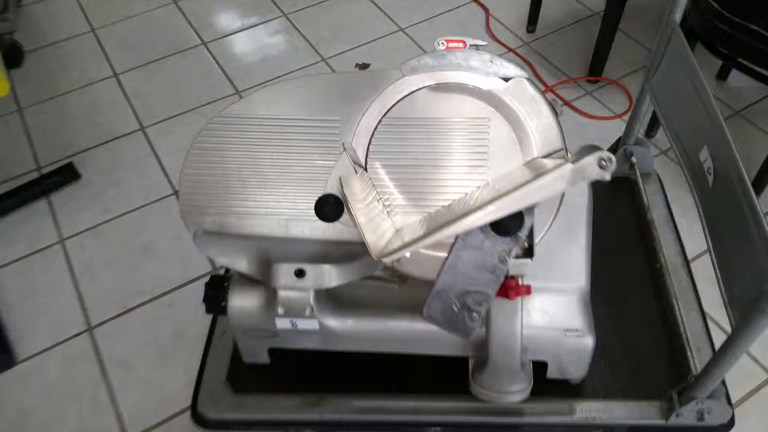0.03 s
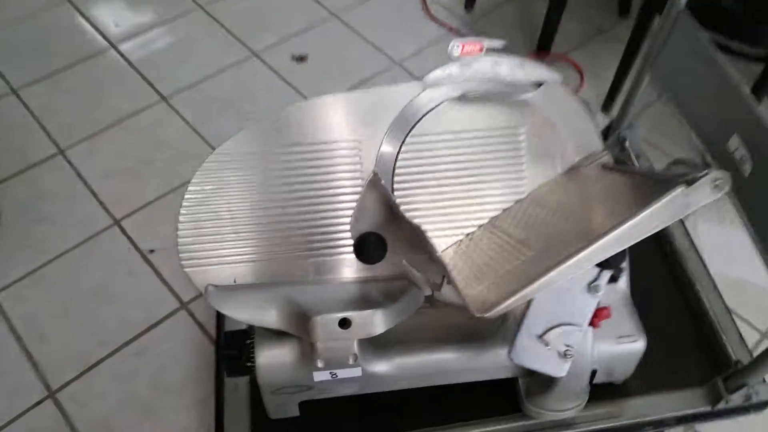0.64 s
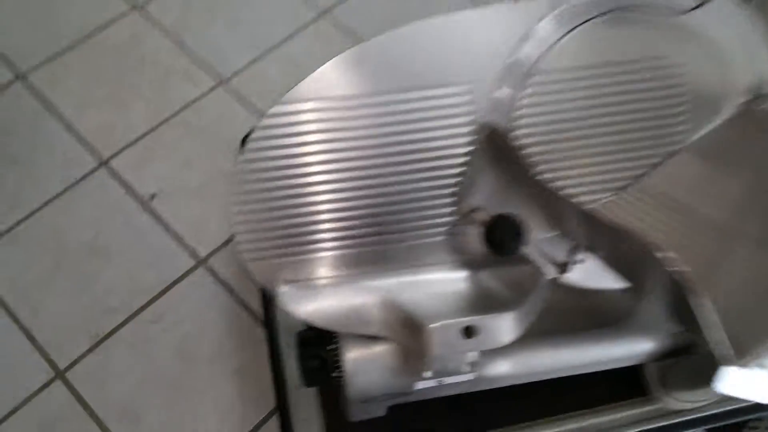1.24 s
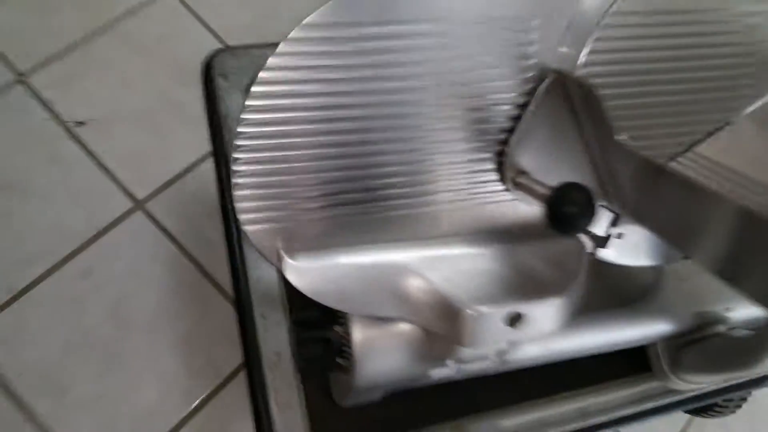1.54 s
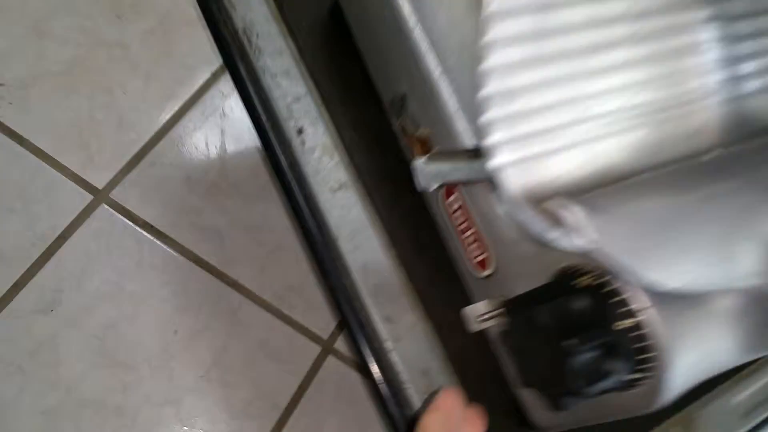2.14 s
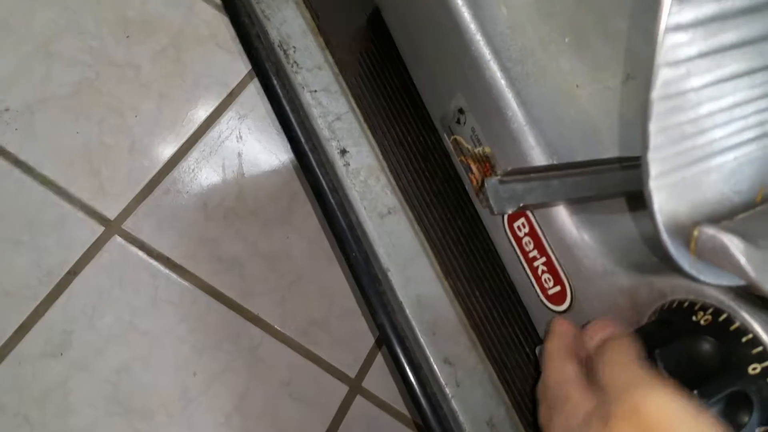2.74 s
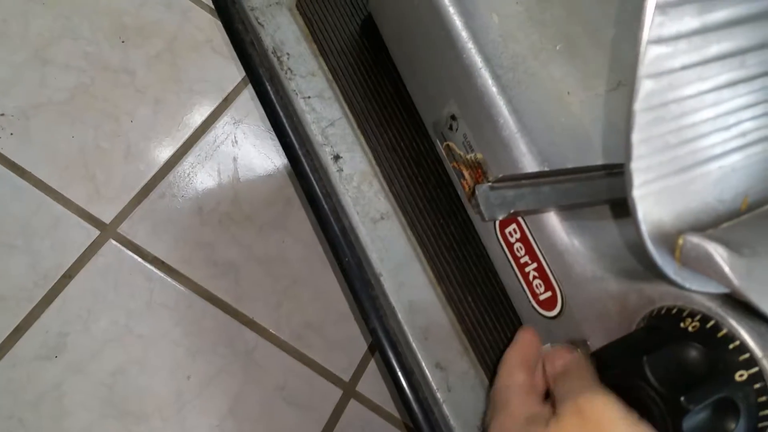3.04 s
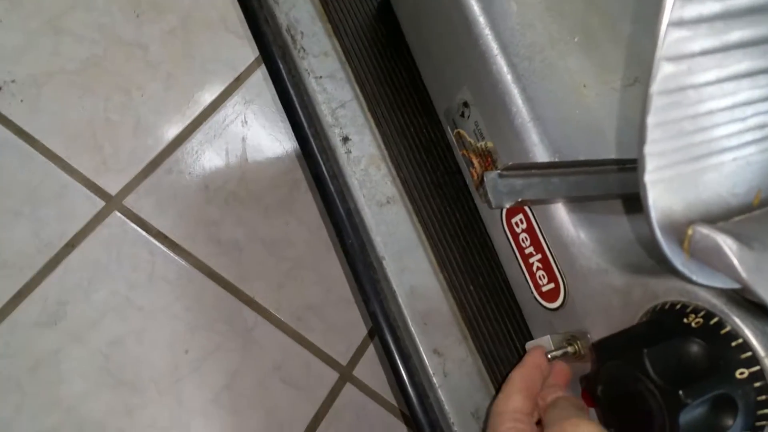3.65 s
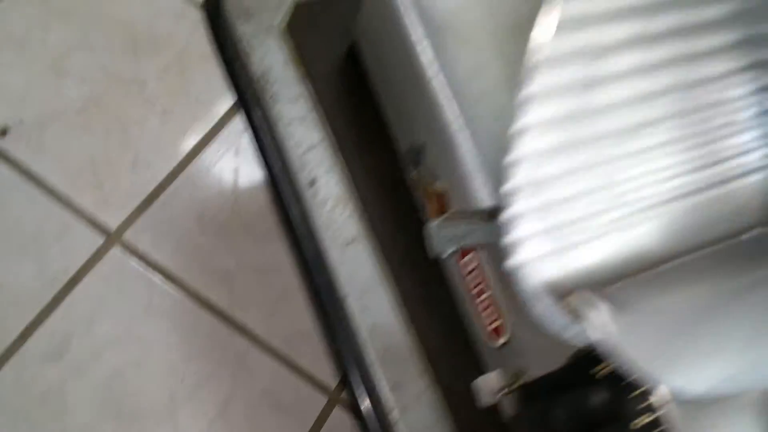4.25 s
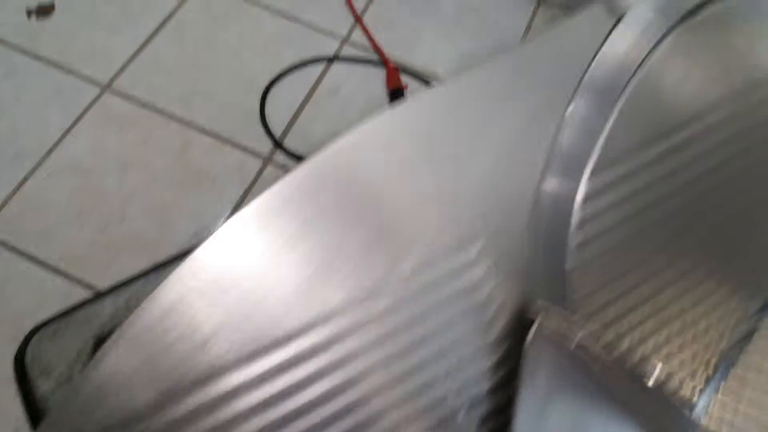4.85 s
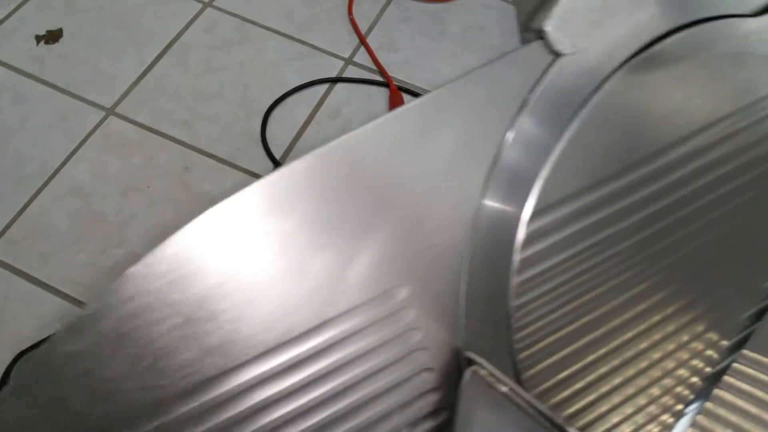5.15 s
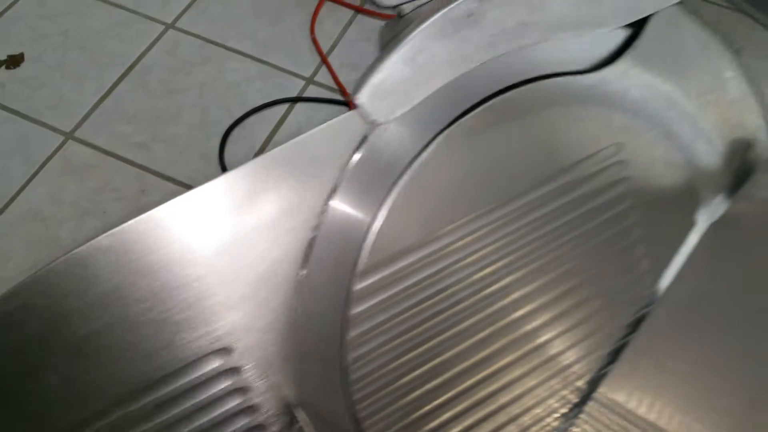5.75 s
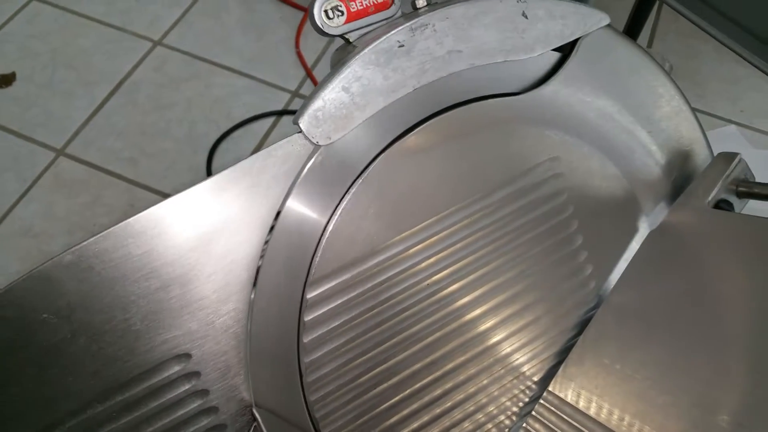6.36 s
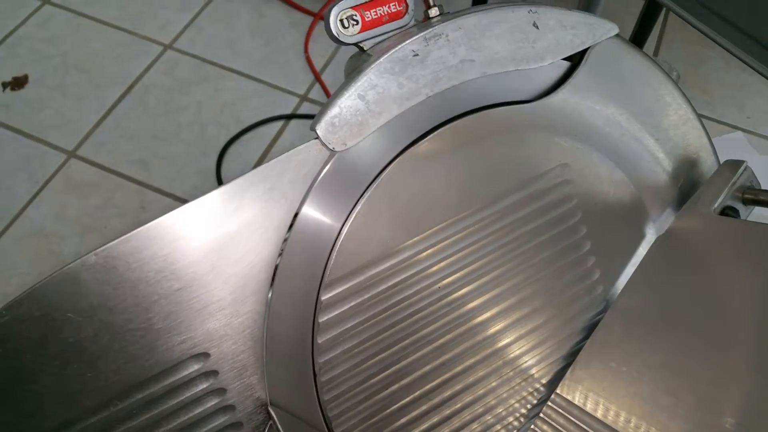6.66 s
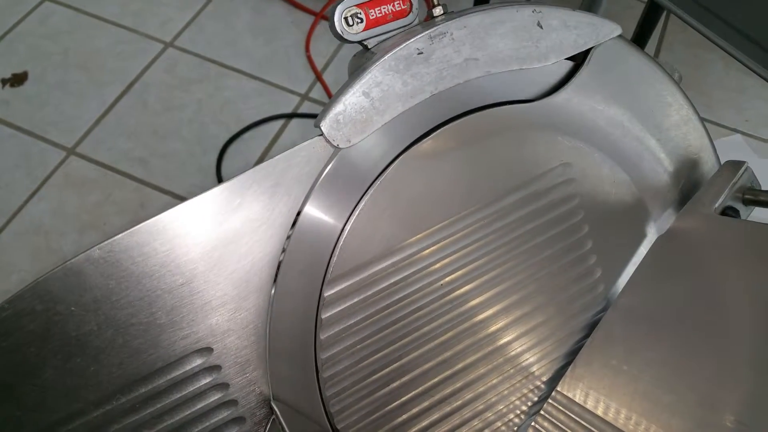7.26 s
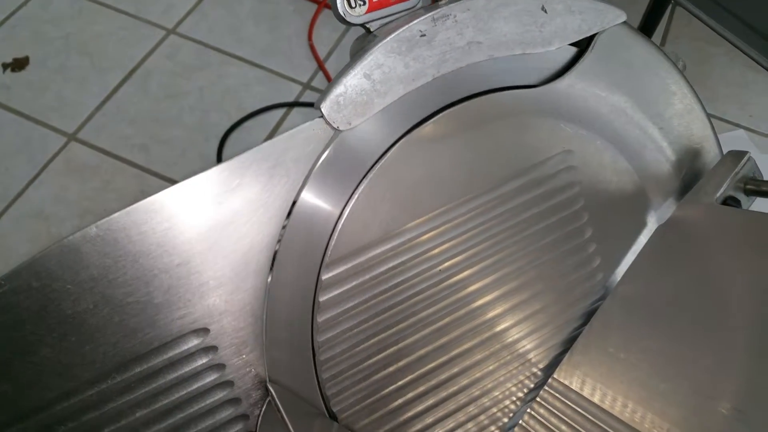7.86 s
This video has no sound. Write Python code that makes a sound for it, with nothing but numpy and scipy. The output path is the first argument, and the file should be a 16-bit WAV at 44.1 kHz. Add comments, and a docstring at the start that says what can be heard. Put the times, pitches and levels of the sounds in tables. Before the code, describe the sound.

A faint low room rumble fades in at about 0.4 seconds, with an engine throbbing softly beyond the walls. A small dry tick comes at 0.5 seconds. Light knocks and very faint thin squeaks of handling follow between 1 and 2 seconds, then a few soft taps and tiny metal pings from 3 to 3.7 seconds. At about 3.9 seconds the switch of an electric deli slicer snaps on with a sharp, close click that rings briefly in the metal housing and tiled room. The motor spins up, and a second click follows at 4.1 seconds. It settles into a steady electric hum with a whirring drive and a soft blade hiss, which grow slightly as the microphone nears. From 4.5 seconds the blade brushes its guard faintly about five times a second, clearest near 5.7, with a few small rattles around 5.3. The slicer runs on until the end at 8 seconds.

```python
"""Deli slicer in a tiled room

An engine throbs faintly beyond the walls. After some light handling the toggle snaps on and the
induction motor runs up until its starting switch drops out with a click. It settles into a mains hum,
with the whir of the drive and the hiss of the blade, whose rim brushes its guard once a turn."""
import sys
import numpy as np
from scipy import signal
from scipy.fft import irfft, next_fast_len
from scipy.io import wavfile
from scipy.ndimage import uniform_filter1d

SR = 44100
rng = np.random.default_rng(int(sys.argv[2]) if len(sys.argv) > 2 else 0)


def to_wav(s):
    """Save 16-bit WAV."""
    ch = np.atleast_2d(s).T  # columns
    pcm = np.round(np.clip(ch, -1, 1) * 32767)  # PCM
    wavfile.write(sys.argv[1], SR, pcm.astype(np.int16))


N = 349272
TIME = np.arange(N) / SR
BASS_FADE_S, AIR_FADE_S = 0.51, 0.69
ON_S, DROP_OUT_S = 3.934, 4.112  # the toggle closes; the starting switch drops out
APPROACH_S = 4.56  # the listener starts to move over the casting and on to the blade
MAINS_HZ, ROTOR_HZ = 60, 29.98


def from_db(db):
    """Decibels to gain."""
    return 10 ** (np.asarray(db) / 20)


def unit_rms(x):
    """Scale to an rms of 1."""
    return x / np.sqrt(np.mean(x ** 2) + 1e-20)


def automation(rows):
    """One curve per column after the time, joined by straight lines."""
    times, *columns = np.transpose(rows)
    return [np.interp(TIME, times, column) for column in columns]


def at_hz(rows, hz):
    """Read a table on a log-frequency axis."""
    freqs, values = np.transpose(rows)
    return np.interp(np.log(hz + 1e-9), np.log(freqs), values)


def ramp(start, length):
    """A straight rise from 0 to 1."""
    return np.clip((TIME - start) / length, 0, 1)


def fade_in(length):
    """The background eases in after a short silence."""
    return ramp(0.41, length) ** 1.5


def swells(rows):
    """A smooth hump for each row of centre in seconds, length in seconds, level in dB."""
    return sum(from_db(db) * np.exp(-np.minimum((2 * (TIME - at) / length) ** 2, 50))
               for at, length, db in rows)


def drift(hz):
    """A smooth random wobble with a spread of 1."""
    step, warm_up = 40, 2000
    r = np.exp(-2 * np.pi * step * hz / SR)
    white = rng.standard_normal(N // step + warm_up + 2)
    slow = signal.lfilter([1], [1, -2 * r, r * r], white)[warm_up:]
    return np.interp(np.arange(N) / step, np.arange(len(slow)), unit_rms(slow))


def clicks(times, db):
    """One impulse per contact."""
    out = np.zeros(N)
    out[np.round(np.asarray(times) * SR).astype(int)] = from_db(db)
    return out + 1e-18


def decay(x, t60):
    """Each impulse dies away, by 60 dB in t60 seconds."""
    return signal.lfilter([1], [1, -from_db(-60 / (t60 * SR))], x)


def ring(x, hz, t60):
    """A unit impulse sets a sine of height 1 ringing."""
    r, w = from_db(-60 / (t60 * SR)), 2 * np.pi * hz / SR
    return signal.lfilter([0, np.sin(w)], [1, -2 * r * np.cos(w), r * r], x)


def resonate(x, hz, width):
    """A resonance with a peak gain of 1."""
    r, w = np.exp(-np.pi * width / SR), 2 * np.pi * hz / SR
    return signal.lfilter(np.array([1, 0, -1]) * (1 - r * r) / 2, [1, -2 * r * np.cos(w), r * r], x)


def pan(x, db):
    """Left louder than right by db."""
    return x * from_db([[db / 2], [-db / 2]])


# The stereo image. Each row: frequency in Hz, left-right correlation.
STEREO_LIKENESS = [(60, 0.67), (250, 0.86), (400, 0.94), (680, 0.45), (1300, -0.18), (3000, 0.019),
                   (15000, -0.047)]


def noise(spectrum, resonances=(), ripple_db=0):
    """Unit-rms stereo noise shaped by (Hz, dB) points, resonances and the ripple of many small modes."""
    size = next_fast_len(N)
    hz = np.arange(1, SR / 2, 3)
    octaves_outside = np.abs(np.log2(hz / np.clip(hz, spectrum[0][0], spectrum[-1][0])))
    colour_db = at_hz(spectrum, hz) - 36 * octaves_outside
    colour_db += ripple_db * unit_rms(uniform_filter1d(rng.standard_normal(len(hz)), size=25))
    for centre, width, lift in resonances:
        colour_db += lift / (1 + (2 * (hz - centre) / width) ** 2)
    alike = np.clip(at_hz(STEREO_LIKENESS, hz), -.99, .99)
    bins = np.arange(size // 2 + 1) * SR / size
    gains = [np.interp(bins, hz, from_db(colour_db) * np.sqrt(1 + sign * alike)) for sign in (1, -1)]
    mid, side = (gain * rng.standard_normal(2 * len(bins)).view(complex) for gain in gains)
    return unit_rms(irfft(np.array([mid + side, mid - side]), size)[:, :N])


# The tiled room's tail. Each row: frequency in Hz, t60 in seconds.
REVERB_T60 = [(200, 0.47), (1000, 0.46), (3000, 0.21), (7000, 0.21), (14000, 0.15)]


def room(x):
    """Diffuse echoes off the tiles; the treble dies first."""
    t, tail = TIME[:SR // 2], 0
    edges = np.geomspace(100, 18000, 9)
    for low, high in zip(edges, edges[1:]):
        hz = np.sqrt(low * high)
        band = signal.butter(2, [low, high], "band", fs=SR, output="sos")
        mid, side = signal.sosfilt(band, rng.standard_normal((2, len(t))))
        alike = at_hz(STEREO_LIKENESS, hz)
        stereo = np.sqrt(1 + alike) * mid + np.sqrt(1 - alike) * side * [[1], [-1]]
        tail = tail + stereo * from_db(-60 * t / at_hz(REVERB_T60, hz))
    tail = unit_rms(tail * (1 - np.exp(-t / 0.0015))) / np.sqrt(len(t))
    return signal.fftconvolve(x, tail, axes=1)[:, :N]


# The two colours of the room tone. Each row: frequency in Hz, relative level in dB.
RUMBLE_EQ = [(15, -32), (38, 1), (60, -5.5), (80, -3.5), (130, -2.5), (200, 4.5), (270, -8.5), (330, -23.5)]
AIR_EQ = [(210, -42), (350, 0), (373, -1), (466, -1), (824, -3.5), (1030, -6.5), (1530, -5.5),
          (2670, -13.5), (4870, -19.5), (6790, -15.5), (8480, -24), (11500, -22), (15500, -25)]
# The air's fader, ahead of the fade-in. Each row: time in seconds, level in dB.
AIR_FADER = [(1.1, -60), (2.7, -57.5), (3.3, -63)]


def room_tone(rumble_db=-49):
    """Low rumble and a faint wash of air."""
    air_db, = automation(AIR_FADER)
    rumble = from_db(rumble_db) * fade_in(BASS_FADE_S) * noise(RUMBLE_EQ)
    return rumble + from_db(air_db) * fade_in(AIR_FADE_S) * noise(AIR_EQ)


# The engine eases down to idle. Each row: time in seconds, cycles per second.
ENGINE_PACE = [(0.92, 14.8), (1.2, 13.4), (2.4, 13.1), (2.85, 12.3)]
# Its faders. Each row: time in seconds, throb level in dB, exhaust drone level in dB.
ENGINE_FADERS = [(0.85, -43.5, -42), (1.35, -46.5, -42.5), (1.95, -50.5, -46.5), (2.5, -48.5, -50),
                 (2.9, -43.5, -61), (3.2, -42.5, -60), (3.45, -43.5, -45.5), (3.9, -54.5, -44.5)]
# What passes the walls. Each row: centre in Hz, width in Hz, relative level in dB.
WALL_BANDS = [(39, 7.3, -23), (87, 18, -33), (111.6, 6.9, 4), (161.7, 8.1, 10.5), (184.4, 17, 6),
              (194, 26, -2.5), (230.8, 5.5, 12), (255.6, 5.7, -29)]


def distant_engine(strong_beat_s=3.135, idle_lope_db=10.5, uneven_db=1.5, wall_hz=275):
    """Three firings a cycle, one stronger than the others at idle, muffled by the walls."""
    speed, = automation(ENGINE_PACE)
    throb_db, drone_db = automation(ENGINE_FADERS)
    lope_db = np.maximum(idle_lope_db - 8 * (speed - speed[-1]), 0)  # evens out above idle
    cycles = np.cumsum(speed) / SR
    firing = np.floor(3 * (cycles - np.interp(strong_beat_s, TIME, cycles)))
    at = np.flatnonzero(np.diff(firing)) + 1
    weak = firing[at] % 3 > 0
    pulses = clicks(at / SR, -lope_db[at] * weak + uneven_db * rng.standard_normal(len(at)))
    throb = sum(from_db(db) * resonate(pulses, hz, width) for hz, width, db in WALL_BANDS)
    throb = signal.sosfilt(signal.butter(8, wall_hz, fs=SR, output="sos"), throb)
    throb /= np.sqrt(np.abs(uniform_filter1d(throb ** 2, SR // 4)) + 1e-14)  # hold the level steady
    # the exhaust booms at the fourth firing harmonic, weakly at the second
    firing_phase = 6 * np.pi * cycles
    drone_gain = np.sqrt(2) * from_db(drone_db + 2 * drift(6))
    drone = np.sin(4 * firing_phase + .4 * drift(6)) + from_db(-15) * np.sin(2 * firing_phase)
    return pan(from_db(throb_db) * throb + drone_gain * drone, db=2.5) * fade_in(BASS_FADE_S)


# Thin, faint squeaks. Each row: centre in seconds, length in seconds, top pitch in Hz.
SQUEAK_ARCHES = [(1.04, 0.33, 11460), (1.245, 0.15, 11600), (1.328, 0.12, 10900), (1.62, 0.1, 10700)]


def squeaks(base_hz=8400, level_db=-74, roughness=0.0126):
    """Pitch and loudness rise and fall together with each slide."""
    arches = [(top - base_hz) * swells([(at, length, 0)]) for at, length, top in SQUEAK_ARCHES]
    rise_hz = np.max(arches, axis=0)
    phase = 2 * np.pi * np.cumsum((base_hz + rise_hz) * (1 + roughness * drift(290))) / SR
    tone = np.sin(phase) + from_db(-10) * np.sin(1.21 * phase)
    return from_db(level_db) * rise_hz / rise_hz.max() * tone


# Light knocks. Each row: start in seconds, then relative levels of thud, clack and tick in dB.
KNOCK_HITS = [(1.053, -57, -57.5, -73), (1.083, -55, -57, -74), (1.141, -54, -48.5, -66),
              (1.29, -72, -63, -57.5), (1.622, -67, -58, -74), (1.704, -37.5, -52.5, -74),
              (1.739, -56, -47, -76), (2.08, -57.5, -54.5, -69), (2.88, -62, -67, -72),
              (3.552, -53, -53, -69), (3.707, -51, -51.5, -60)]


def knocks(t60=0.027, gain_db=6.5):
    """Soft contacts build over a millisecond or so and die away in three bands of noise."""
    times, *levels = np.transpose(KNOCK_HITS)
    contact = decay(signal.unit_impulse(600), t60=0.002)
    contact /= contact.sum()
    thud = [(280, 7.5), (500, 3), (700, -10)]
    clack = [(800, 7.5), (1500, 0), (2300, -5)]
    tick = [(2400, 7), (7000, -6), (14000, -7)]
    return sum(signal.oaconvolve(decay(clicks(times, db + gain_db), t60), contact)[:N] * noise(eq)
               for db, eq in zip(levels, (thud, clack, tick)))


# A dry triple tick. Each row: start in seconds, level in dB.
TICK_HITS = [(0.5325, -33.5), (0.5352, -41), (0.5382, -41.5)]
# Brief bright rubs; the last two are the blade's rim catching its guard harder. Each row: centre in seconds,
# length in seconds, level in dB.
RUB_SWELLS = [(1.803, 0.054, -55.5), (2.72, 0.3, -66), (5.79, 0.043, -47), (6.207, 0.035, -55)]
# Small metal pings. Each row: start in seconds, pitch in Hz, level in dB, t60 in seconds.
METAL_PINGS = [(3.155, 3980, -68, 0.08), (3.215, 3500, -65, 0.074), (3.44, 1980, -61, 0.078),
               (3.712, 2015, -50, 0.076), (6.198, 4380, -46.5, 0.1)]


def handling(room_db=-7):
    """Knocks and pings echo off the tiles; ticks, rubs and squeaks stay dry. The two late rubs are the blade's
    rim catching its guard."""
    hits = knocks() + sum(ring(clicks([at], db), hz, t60) for at, hz, db, t60 in METAL_PINGS)
    tick_eq = [(2000, -25), (4800, -5), (6200, 7), (7500, 3), (9000, -20), (13000, -25)]
    ticks = decay(clicks(*np.transpose(TICK_HITS)), t60=0.0049) * noise(tick_eq)
    rub_eq = [(3200, -6), (3800, 0), (4350, -7), (5000, -9), (6800, -4), (8500, -23), (14000, -24)]
    rubs = swells(RUB_SWELLS) * noise(rub_eq)
    return hits + from_db(room_db) * room(hits) + ticks + rubs + squeaks()


# Toggle, then starting switch. Each row: start in seconds, relative crack and ring levels in dB.
SWITCH_SNAPS = [(3.9342, -15.5, -22), (3.9355, -25, -41), (3.9392, -42, -41), (4.095, -32, -47),
                (4.1111, -18.5, -43), (4.116, -38, -53)]
# The crack's colour. Each row: frequency in Hz, relative level in dB.
CRACK_EQ = [(500, -20), (750, -0.5), (950, 3.5), (1500, 0), (2200, -5), (3200, -2.5), (5200, -6),
            (7500, -8.5), (9500, -14), (12000, -11.5), (15500, -17)]
# The housing's ring. Each row: pitch in Hz, relative level in dB, t60 in seconds.
HOUSING_MODES = [(467, -20, 0.3), (895, -1, 0.071), (1030, -12, 0.11), (1115, 3.5, 0.11), (1200, 0, 0.065),
                 (1250, -5.5, 0.16), (1330, -4.5, 0.22), (1553, -6, 0.13), (1900, -6, 0.05),
                 (2075, 5.5, 0.06), (2190, -6, 0.07), (2460, 7, 0.026), (2760, -4, 0.065),
                 (3650, -14, 0.14), (4770, -12, 0.13), (5400, -20, 0.1), (7200, -19, 0.06)]


def switches(ring_gain_db=2.5, crack_room_db=-3.5, ring_room_db=-5, right_lag_s=0.00011):
    """Each snap is a short crack that rings the housing; the ring reaches the two sides out of step."""
    times, crack_db, ring_db = np.transpose(SWITCH_SNAPS)
    crack = decay(clicks(times, crack_db), t60=0.036) * noise(CRACK_EQ)
    blows = clicks(times, ring_db + ring_gain_db)
    # band-passed, as a plate radiates little below its mode
    body = sum((-1) ** k * from_db(db) * resonate(ring(blows, hz, t60), hz, width=hz / 2)
               for k, (hz, db, t60) in enumerate(HOUSING_MODES))
    body = np.array([body, np.interp(TIME - right_lag_s, TIME, body)])
    echoes = room(from_db(crack_room_db) * crack + from_db(ring_room_db) * body)
    low_cut = signal.butter(4, 420, "high", fs=SR, output="sos")
    return pan(signal.sosfilt(low_cut, crack + body + echoes), db=1.5)


# The spring's ring. Each row: pitch in Hz, relative level in dB, t60 in seconds.
SPRING_MODES = [(3670, 8.5, 0.081), (4247, -1, 0.13), (4700, 5, 0.1), (6783, -12, 0.2), (6960, 3, 0.086)]


def switch_spring(level_db=-39, room_db=-3):
    """The starting switch's spring rings as it drops out."""
    rings = sum(ring(clicks([DROP_OUT_S], level_db + db), hz, t60) for hz, db, t60 in SPRING_MODES)
    return rings + from_db(room_db) * room(pan(rings, 0))


def run_up():
    """The motor's speed, from 0 at the toggle to 1 at the drop-out."""
    return ramp(ON_S, DROP_OUT_S - ON_S)


def strain(release_s=0.076):
    """The strain of starting: 1 until the drop-out, then dying away."""
    return np.exp(-np.maximum(TIME - DROP_OUT_S, 0) / release_s)


def mains_hum(t, starting, running, slip_hz=3.85, overshoot_db=7):
    """The iron hums at twice and four times the mains, on the starting winding and then running."""
    low = from_db(-24.5) * starting * run_up() ** 1.7
    low += from_db(-30.5) * ramp(DROP_OUT_S + 0.042, 0.055)  # returns after a short pause
    beat_db = 0.6 * np.cos(2 * np.pi * slip_hz * (TIME - 5.41))  # the rotor slips behind the field
    high = from_db(-38.5) * starting
    high += from_db(-31.5 + beat_db + overshoot_db * strain(release_s=0.22)) * running
    high += swells([(DROP_OUT_S + 0.013, 0.065, -22)])  # a surge from the jolt of the drop-out
    phase = 2 * np.pi * MAINS_HZ * t
    hum = low * from_db(.5 * drift(6)) * np.sin(2 * phase + 0.077 * drift(2.5))
    return hum + high * from_db(1.7 * drift(7)) * np.sin(4 * phase + 0.33 * drift(6))


def housing_groan(t, starting, hz=450, level_db=-33.5):
    """The housing sings at its lowest mode through the run-up and swells just after each switching."""
    kicks = swells([(at + 0.023, 0.022, -25) for at in (ON_S, DROP_OUT_S)]) * (TIME > ON_S)
    return np.maximum(from_db(level_db) * starting, kicks) * np.sin(2 * np.pi * hz * t + .5 * drift(35))


# The rotor's tones. Each row: multiple of the shaft rate, relative level in dB.
ROTOR_TONES = [(5, -44), (12, -67), (15, -43.5), (16, -51), (20, -52), (25, -59), (28, -76), (32, -65),
               (36, -59)]


def motor(rotor_gain_db=-2.5, left_lag_s=0.00016, changeover_s=0.015):
    """The induction motor hums and groans; once it is running, the shaft adds weak, wavering tones."""
    t = TIME - [[left_lag_s], [0]]
    running = ramp(DROP_OUT_S, changeover_s)
    starting = ramp(ON_S, changeover_s) - running
    hum = mains_hum(t, starting, running)
    groan = housing_groan(t, starting)
    shaft = 2 * np.pi * ROTOR_HZ * t
    tones = sum(from_db(db + rotor_gain_db + 3.4 * drift(4.1)) * np.sin(k * shaft + 1.44 * drift(2.2))
                for k, db in ROTOR_TONES)
    return pan(np.sqrt(2) * (hum + groan + tones * ramp(DROP_OUT_S, 0.28)), db=2)


# The colours of belt and gears. Each row: frequency in Hz, relative level in dB.
WHIR_EQ = [(70, -46), (100, -4), (150, -7), (200, -3), (260, -2), (300, -9.5), (350, -7.5), (430, -2.5),
           (540, -3.5), (640, -9), (720, -18.5), (900, -33)]
GEAR_EQ = [(560, -11), (700, -7.5), (900, 0.5), (1080, -4.5), (1350, -5.5), (1750, -7), (2050, -5.5),
           (2350, -11.5), (2950, -13.5), (3500, -20)]
# The casting's resonances. Each row: centre in Hz, width in Hz, lift in dB.
CASTING_PEAKS = [(156, 6.7, -12), (187, 23, 4.5), (224, 18, 0), (359.7, 11, 11), (408.5, 30, 4.5),
                 (742, 40, 10), (1253, 32, 5.5), (1585, 25, 6.5), (1830, 36, -2), (2034, 49, 2),
                 (2657, 21, 6.5), (2970, 19, 12.5)]


def belt_and_gears(near_db=3.5):
    """Two noises in the casting, both louder under strain; the whir grows as the listener nears."""
    whir_db = -38.5 + 4.5 * strain() + near_db * ramp(APPROACH_S, 0.35) + drift(8)
    whir = from_db(whir_db) * noise(WHIR_EQ, CASTING_PEAKS)
    gear_db = -43.5 + 7 * strain() + 0.75 * drift(30)
    gears = np.sqrt(run_up()) * from_db(gear_db) * noise(GEAR_EQ, CASTING_PEAKS, ripple_db=2.1)
    return whir, gears


# The colour of the hiss. Each row: frequency in Hz, relative level in dB.
BLADE_EQ = [(2400, -9), (3100, -1), (4300, -2), (4900, -2.5), (5500, -1.5), (6500, -0.5), (7400, -4),
            (8200, -8), (9300, -11.5), (10500, -12.5), (12500, -15), (14300, -17.5), (15500, -18)]
# The blade's resonances. Each row: centre in Hz, width in Hz, lift in dB.
BLADE_PEAKS = [(2980, 57, 6.9), (4400, 60, 4.1), (5470, 70, 7), (6040, 42, 3.7), (10400, 300, 3)]


def blade_hiss(near_db=4.5, grain_db=1.94):
    """Two contacts come and go, each stirring its own modes of the blade; the hiss grows up close."""
    hiss = sum(from_db(drift(8.1)) * noise(BLADE_EQ, BLADE_PEAKS, ripple_db=3) for _ in range(2))
    level_db = -54 + 5 * strain() + near_db * ramp(APPROACH_S, 1.86) + grain_db * drift(120)
    return run_up() * from_db(level_db) * unit_rms(hiss)


# How hard the rim brushes. Each row: time in seconds, relative level in dB.
BRUSH_FADER = [(4.55, -52.5), (5.7, -43), (6.4, -52), (7.9, -59)]
# The ring in the scrape. Each row: centre in Hz, width in Hz, lift in dB.
SCRAPE_PEAKS = [(2004, 137, 20), (2680, 90, -1), (2980, 130, 8), (4480, 87, 17), (5490, 110, 13),
                (6390, 120, 10.5)]


def rim_scrapes(first_s=4.55, turn_s=0.2055, length_s=0.099, scatter_db=0.5):
    """The blade's rim brushes its guard once a turn, catching and slipping as it goes."""
    times = np.arange(first_s, TIME[-1], turn_s)
    levels = np.interp(times, *np.transpose(BRUSH_FADER)) - scatter_db * rng.standard_normal(len(times))
    brushes = swells([(at, length_s, db) for at, db in zip(times, levels)])
    stick_slip = from_db(2.5 * drift(55) - 1.5)
    eq = [(1800, -0.5), (3500, 0.5), (7000, -2.5), (9000, -11), (15000, -15)]
    return brushes * stick_slip * noise(eq, SCRAPE_PEAKS, ripple_db=4.5)


# Scattered rattles. Each row: start in seconds, level in dB.
RATTLE_HITS = [(4.852, -41), (5.12, -36), (5.341, -27.5), (5.354, -36), (5.524, -31.5), (6.705, -46)]


def rattles():
    """Loose parts rattle under the motor."""
    eq = [(450, -5), (620, 9), (750, 13), (900, -5), (1300, -25)]
    return decay(clicks(*np.transpose(RATTLE_HITS)), t60=0.12) * noise(eq)


def drive(buzz=0.1, shaft_throb=0.039, attack_s=0.042):
    """The moving parts together; gears and blade pulse with the motor's torque."""
    torque = 1 + buzz * np.sin(4 * np.pi * MAINS_HZ * TIME)
    torque += shaft_throb * np.sin(2 * np.pi * ROTOR_HZ * TIME)
    whir, gears = belt_and_gears()
    pulsing = torque * pan(gears + blade_hiss() + rim_scrapes(), db=-3)
    return (whir + rattles() + pulsing) * ramp(ON_S, attack_s)


def scene():
    """The slicer over the sounds of the room."""
    return distant_engine() + room_tone() + handling() + switches() + switch_spring() + motor() + drive()


def record(dry):
    """Soft saturation rounds the peaks and a steep filter cuts the top."""
    rounded = 0.71 * np.tanh(dry / 0.69)
    return signal.sosfilt(signal.ellip(12, .1, 90, 15800, fs=SR, output="sos"), rounded)


dry = scene()
out = record(dry)
to_wav(out)
```